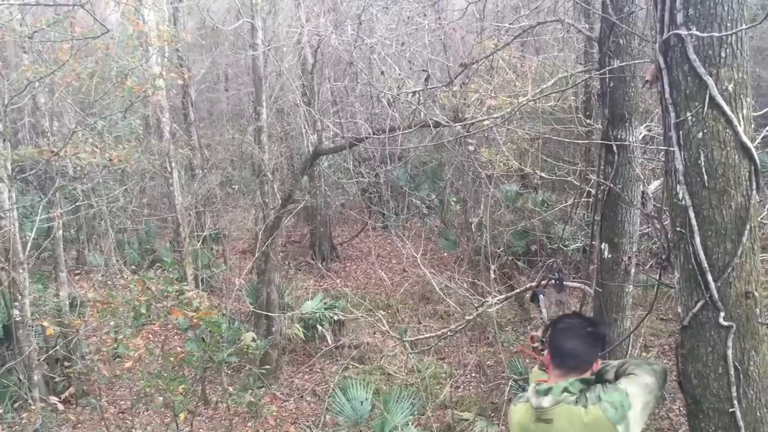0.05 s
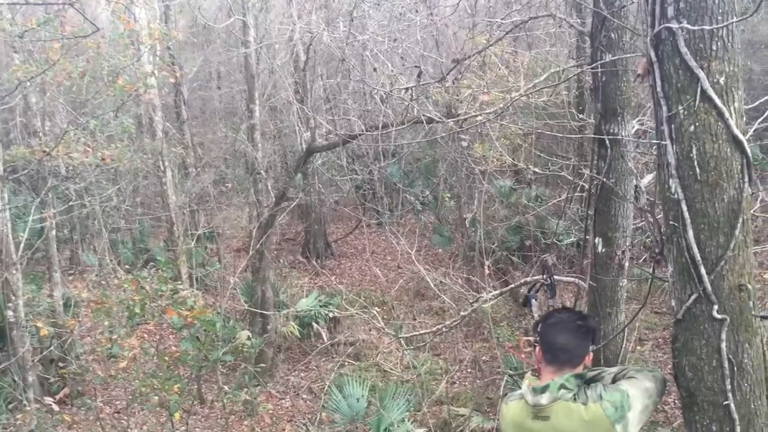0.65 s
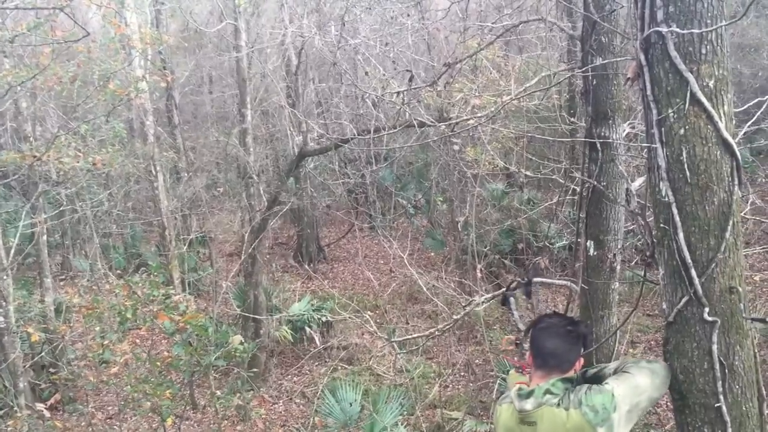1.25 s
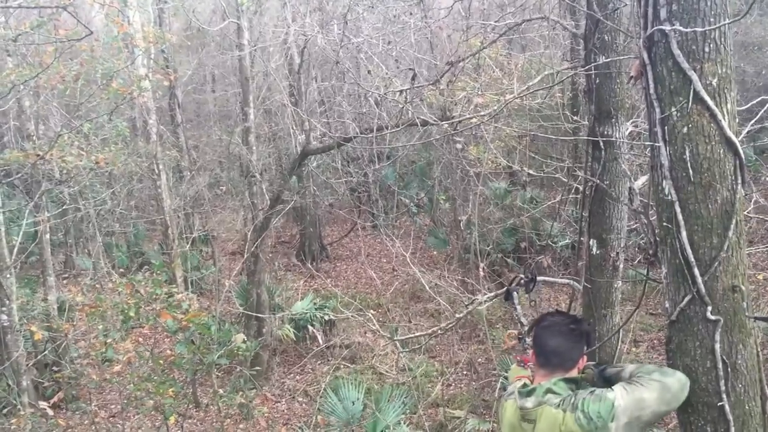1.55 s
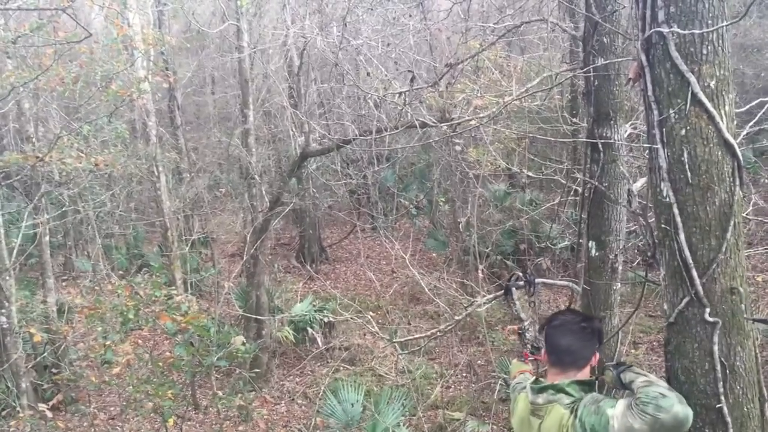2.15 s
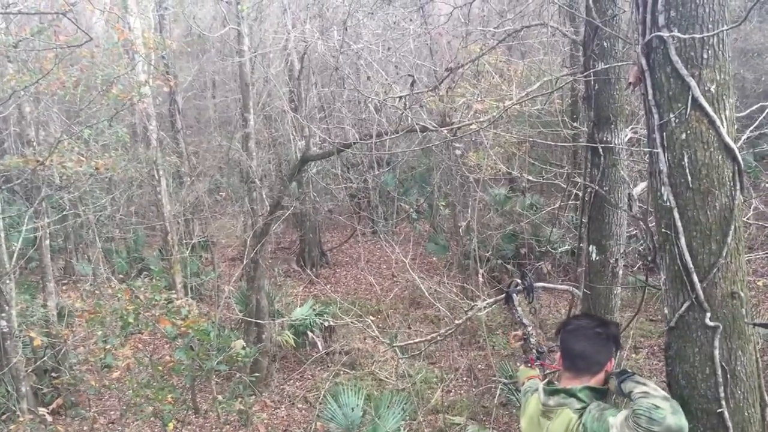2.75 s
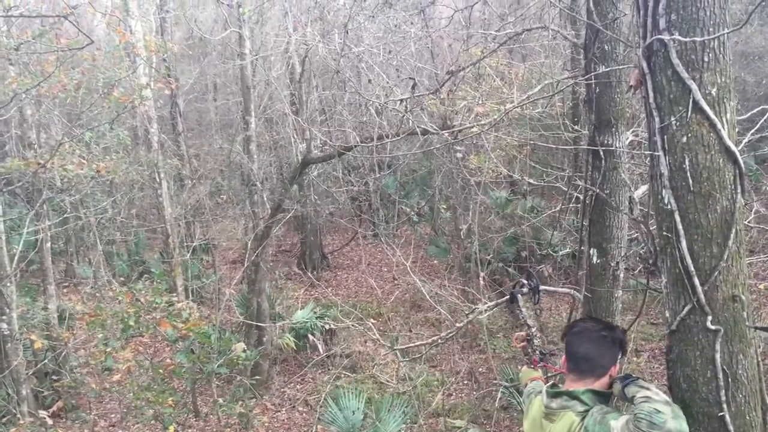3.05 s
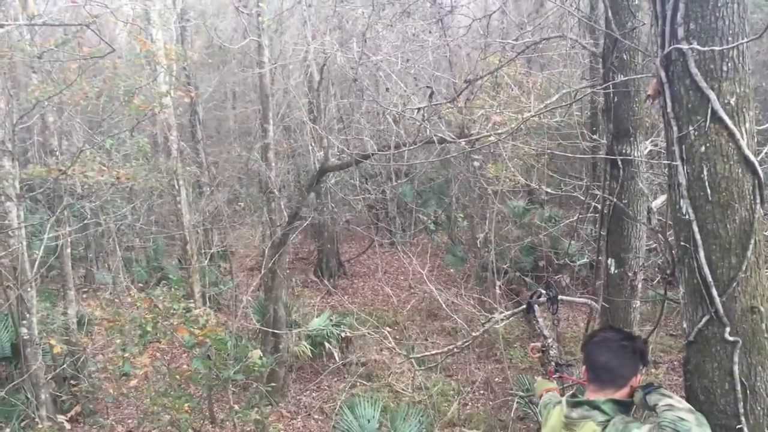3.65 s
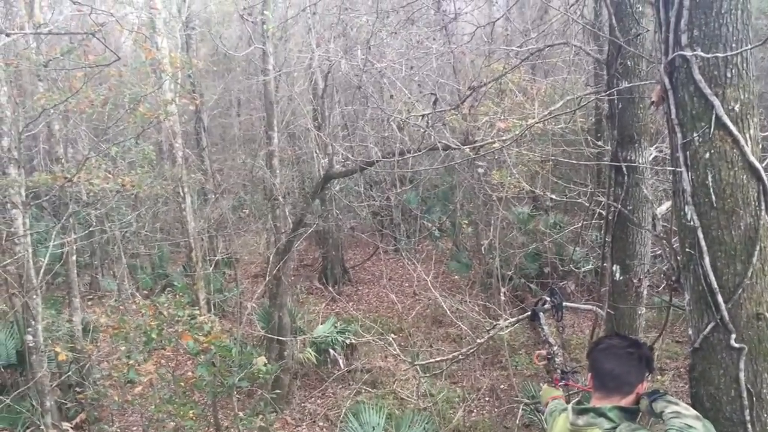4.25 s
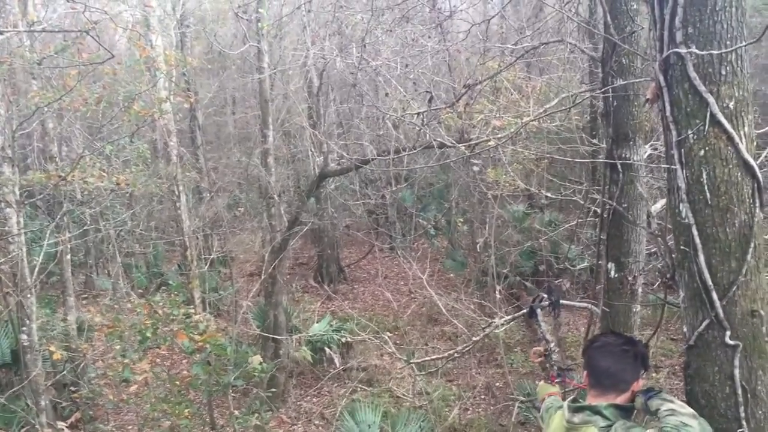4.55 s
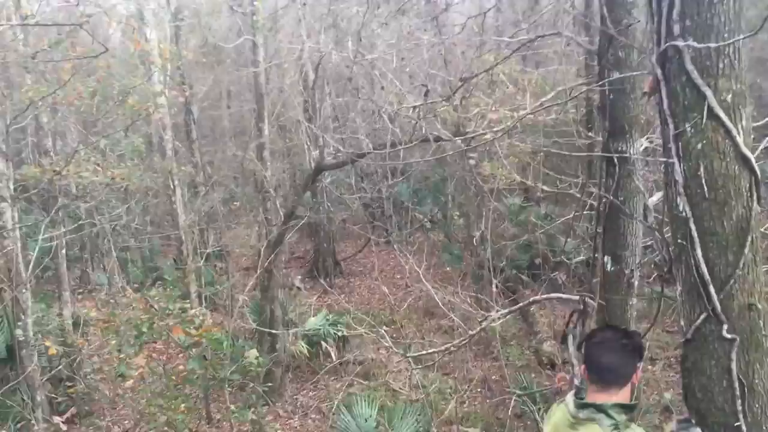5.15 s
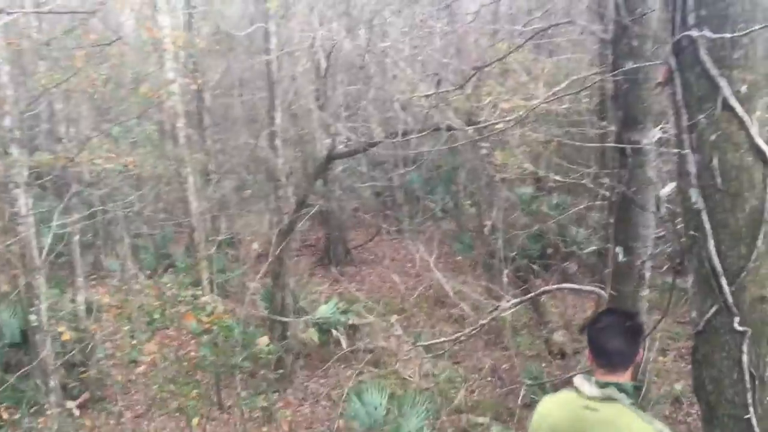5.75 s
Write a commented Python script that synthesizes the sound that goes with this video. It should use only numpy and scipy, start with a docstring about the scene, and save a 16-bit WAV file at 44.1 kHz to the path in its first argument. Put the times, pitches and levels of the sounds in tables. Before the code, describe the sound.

In quiet woods with crickets and distant crows, a compound bow fires with a crack, the arrow strikes, and an animal bolts through dry leaves.

```python
"""A sharp tick from a compound bow's gear, in quiet woods with trilling crickets and far cawing crows.
Cloth brushes and the bow ticks as it is drawn. The release clicks, the string slams into its stop and
rings the frame; the arrow hisses away and strikes. Trunks scatter each crack. An animal bolts
through dry leaves and twigs with a few dull hoof beats."""
import sys
import numpy as np
from scipy import signal
from scipy.fft import rfft, irfft, next_fast_len
from scipy.io import wavfile
from scipy.ndimage import uniform_filter1d

SR = 44100
rng = np.random.default_rng(int(sys.argv[2]) if len(sys.argv) > 2 else 0)


def waveform_to_disk(signal):
    """Save audio, clipped to [-1, 1], as 16-bit WAV at the path in sys.argv[1]."""
    frames = np.transpose(np.atleast_2d(signal))
    scaled = np.clip(frames, -1, 1) * 32767
    samples = np.round(scaled).astype(np.int16)
    wavfile.write(sys.argv[1], SR, samples)


N = 259749
TIME = np.arange(N) / SR


def bow(release_s=4.6883, stop_s=4.7115, whip_db=-46, surge_db=-23.5, surge_s=0.0021):
    """The string whips forward, slams into its stop and sets the frame ringing."""
    # release, string stop, limbs: start_s, crack_db, decay_s, push_db, push_hz
    impacts = [(4.6883, -25, 0.0025, -34.5, 258), (4.7103, -19.5, .003, -36, 910),
               (4.7118, -20.5, 0.0025, -24.5, 210), (4.7136, -27, 0.0093, -18, 660),
               (4.716, -34, .006, -30, 100), (4.7245, -37, 0.0067, -28, 219), (4.7415, -38, .005, -35, 240)]
    # crack and whip spectrum: freq_hz, density_db
    crack_spectrum = [(40, -30), (150, 0), (480, -4), (1100, -2), (1600, -3), (2500, 4), (2950, -5),
                      (3700, 0.5), (5400, 2), (7500, -5), (9000, -0.5), (10500, -7), (13000, -7),
                      (16000, -14)]
    # riser, limb and string modes: freq_hz, level_db, t60_s
    frame_modes = [(109.7, -27.5, 0.11), (216, -28, 0.13), (288.8, -32.5, 0.21), (318, -42.5, 0.48),
                   (355, -29, 0.13), (606, -30, .19), (670, -28.5, 0.11), (724, -36, 0.14),
                   (989, -35, 0.15), (1243, -29.5, 0.1), (1320, -32, 0.11), (1970, -42, 0.26),
                   (2320, -34, 0.14), (2510, -30, .13), (2620, -36, 0.12), (3180, -36, .12),
                   (3410, -38, .13), (3670, -43, 0.13), (4350, -36, 0.13), (5320, -27, .11),
                   (7104, -37, .11)]
    # trunk echo spectrum: freq_hz, density_db
    echo_spectrum = [(30, -44), (60, -10), (300, -2), (480, -9.5), (650, -8), (1100, -6.5), (1550, -10.5),
                     (2300, -8), (5500, -10.5), (9000, -12.5), (13800, -17), (16000, -25)]
    out, t = blows(impacts, crack_spectrum), TIME[:SR]
    whip = amp(whip_db) + amp(surge_db) * np.exp(-abs(TIME - stop_s) / surge_s)
    out += whip * (TIME > release_s) * (TIME < stop_s) * noise(crack_spectrum, N)
    # neighbouring modes swing in opposite directions
    ring = sum((-1) ** k * amp(db - 60 * t / t60_s) * np.sin(2 * np.pi * hz * t)
               for k, (hz, db, t60_s) in enumerate(frame_modes))
    add(out, stop_s, amp(-2) * ring * (1 - np.exp(-t / 0.0019)))
    add(out, stop_s, scatter(echo_spectrum, near_db=-28.5, stretch=0.82, far_db=-50, far_t60_s=1.16))
    return out


def arrow(launch_s=4.7115, hit_s=5.048, hiss_db=-47.5, rise_s=0.045, distance_doubling_s=0.19):
    """The vanes hiss, fading with distance; the head strikes with a crack."""
    # strike and first reflections: start_s, crack_db, decay_s, push_db, push_hz
    impacts = [(5.043, -24.5, 0.0015, -23, 706), (5.0462, -23, .005, -25, 237),
               (5.0538, -39, .006, -20, 600), (5.056, -40, .006, -35, 74), (5.082, -36, .002, -41, 700)]
    # strike spectrum: freq_hz, density_db
    crack_spectrum = [(100, 11), (400, 4.5), (1800, 1), (3500, -7.5), (5000, -3), (6600, 6), (9200, 1),
                      (10500, -6), (16000, -16)]
    # air on the vanes: freq_hz, density_db
    vane_spectrum = [(120, -45), (200, -15), (299, -6), (612, -16), (1420, -6), (1620, -11.5), (2420, -4),
                     (4860, -5), (5520, -3.5), (16000, -23.5)]
    # trunk echo spectrum: freq_hz, density_db
    echo_spectrum = [(30, -36), (60, -6), (160, -8.5), (360, -8.5), (430, -17), (640, -9.5), (1400, -2),
                     (1800, -13), (2200, -8.5), (4500, -11), (6700, -6.5), (9300, -7), (10500, -17),
                     (16000, -22)]
    out = blows(impacts, crack_spectrum)
    flown_s = np.maximum(TIME - launch_s, 0)
    envelope = np.minimum(flown_s / rise_s, 1) / (1 + flown_s / distance_doubling_s) * (TIME < hit_s)
    out += amp(hiss_db) * envelope * noise(vane_spectrum, N)
    add(out, hit_s, scatter(echo_spectrum, near_db=-33, stretch=1.43, far_db=-38.5, far_t60_s=1.2))
    return out


def blows(rows, spectrum):
    """Each blow is a short crack and one swing of pushed air."""
    out, t = np.zeros(N), TIME[:4096]
    for start_s, crack_db, decay_s, push_db, push_hz in rows:
        crack = noise(spectrum, len(t)) * np.exp(-t / decay_s)
        phase = 2 * np.pi * push_hz * t
        surface_speed = np.sin(phase) * phase ** 2 * np.exp(-phase / 1.57)
        push = np.gradient(surface_speed)  # pressure follows acceleration
        add(out, start_s, amp(crack_db) * crack + amp(push_db) * push / abs(push).max())
    return out


def gear_ticks(knock_db=-27, knock_hz=900):
    """The bow's gear ticks, each time over a hollow knock."""
    # ticks, release catch last: start_s, level_db, centre_hz
    ticks = [(.0514, -28, 5900), (.408, -64, 6000), (1.134, -50.5, 1500), (1.333, -44, 1580),
             (1.572, -60, 2000), (4.333, -63, 3000), (4.6883, -33, 2470)]
    knocks = [(start_s, db + knock_db, knock_hz) for start_s, db, _ in ticks]
    return snaps(ticks, octaves=1.02, decay_s=0.0011) + snaps(knocks, octaves=0.4, decay_s=0.0028)


def animal(knock_db=-10.5, knock_ratio=2.48, kick_delay_s=0.055, kick_rise_s=0.022, settle_s=0.21):
    """Each hoof thumps the soil, knocks with its edge and kicks up leaves that settle."""
    # footfalls: start_s, thump_db, pitch_hz, leaves_db
    hooves = [(5.344, -32.5, 270, -44), (5.558, -44, 215, -47), (5.665, -38, 204, -50.5),
              (5.81, -57, 219, -52.5)]
    thuds, leaf_power = np.zeros(N), np.zeros(N)
    since_s = TIME[:SR] - kick_delay_s
    kick = 0.5 * (1 + np.tanh(since_s / kick_rise_s)) * np.exp(-np.maximum(since_s, 0) / settle_s)
    for start_s, db, hz, leaves_db in hooves:
        knock = amp(knock_db) * thump(hz * knock_ratio, rise_s=0.0017)
        add(thuds, start_s, amp(db) * (thump(hz, rise_s=0.0062) + knock))
        add(leaf_power, start_s, (amp(leaves_db) * kick) ** 2)
    return leaves() * np.sqrt(leaf_power) + woods(thuds, t60_s=0.25, wet_db=-14)


def thump(hz, rise_s, sag=0.23):
    """Soft soil swings a few times, sinking in pitch as it gives."""
    u = TIME[:6000] / rise_s
    pitch_hz = hz * (1 + sag * (2 * np.exp(-u / 2) - 1))
    return (u * np.exp(1 - u)) ** 2 * np.sin(2 * np.pi * np.cumsum(pitch_hz) / SR)


def leaves(grains_per_s=5000, spread_db=3.5, clump_db=2.6):
    """Dry leaves crackle in clumps; rms 1."""
    # crackle spectrum: freq_hz, density_db
    leaf_spectrum = [(88, -35), (150, -9), (209, -6.5), (376, -9.5), (1040, -11), (1360, -8.5), (1790, -14),
                     (2140, -9), (4950, -8.5), (5460, -7), (9260, -13), (14500, -24), (16000, -34)]
    sizes = amp(spread_db * np.minimum(rng.exponential(1, N), 3.5)) * rng.choice([-1, 1], N)
    clumps = amp(clump_db * wobble(samples=400))
    grains = sizes * clumps * (rng.random(N) < grains_per_s / SR)
    return colour(woods(grains, t60_s=0.69, wet_db=-2), leaf_spectrum)


def twigs():
    """Twigs snap around the animal."""
    # snaps: start_s, level_db, centre_hz
    breaks = [(5.1305, -34, 4500), (5.552, -43.5, 4000), (5.6216, -38.5, 5050), (5.693, -38.5, 6500)]
    return snaps(breaks, octaves=0.99, decay_s=0.003)


def cloth():
    """Clothing brushes as the archer moves."""
    # brushes: start_s, length_s, level_db, centre_hz, width_octaves
    scuffs = [(.011, 0.017, -55, 8000, 0.56), (0.03, 0.034, -54, 6200, .42), (.066, .07, -55, 6750, .24),
              (0.657, 0.083, -69, 1000, 1.6), (1.144, .3, -79, 8600, .2), (1.283, .03, -61.5, 8750, .2)]
    out = np.zeros(N)
    for start_s, length_s, db, hz, octaves in scuffs:
        stroke = np.sin(np.pi * np.minimum(TIME[:SR] / length_s, 1))
        add(out, start_s, amp(db) * stroke * band(rng.standard_normal(SR), hz, octaves))
    return out


def crows(caw_s=0.16, arch=0.17, rough=0.28, rasp=0.66, treeline_s=0.285, treeline_db=-8):
    """Hoarse arched caws; mainly the throat resonance on the third harmonic carries this far."""
    # caws, the answering crow higher: start_s, level_db, throat_hz
    caws = [(1.03, -57, 1410), (1.21, -68, 1750), (1.39, -65, 1650), (1.765, -57, 1419),
            (1.99, -70.5, 1797), (2.385, -57.5, 1422), (2.985, -59, 1410), (3.62, -62, 1409),
            (4.25, -63.5, 1406), (4.89, -62, 1422), (5.58, -58, 1409)]
    out = np.zeros(N)
    effort = np.sin(np.pi * np.linspace(0, 1, int(caw_s * SR)))  # lifts pitch and loudness together
    for start_s, db, throat_hz in caws:
        jitter, breath = rng.standard_normal((SR // 2, 2))[:len(effort)].T
        pitch_hz = throat_hz / 3 * (1 + arch * (effort - 0.78) + 0.023 * unit(uniform_filter1d(jitter, 200)))
        turns = np.cumsum(pitch_hz) / SR
        voice = unit(sum(np.cos(2 * np.pi * k * turns) for k in range(2, 6)))
        rattle = 1 + rasp * np.sin(2 * np.pi * 0.18 * turns)
        drive = ((1 - rough) * voice + rough * band(breath, throat_hz, octaves=0.32)) * rattle
        throat = band(drive, throat_hz, octaves=0.16) + amp(-22) * band(drive, hz=1936, octaves=0.066)
        call = throat * abs(effort) ** 0.59
        add(out, start_s, amp(db) * call)
        add(out, start_s + treeline_s, amp(db + treeline_db) * call)  # echo off the far trees
    return woods(out, t60_s=1.44, wet_db=0) * amp(2)


def crickets(wander=0.00502, droop=0.043, flutter_db=3, surge_db=1.4):
    """Each wing stroke is a brief tone that sags in pitch; the woods blur the trills."""
    # one row a cricket: pitch_hz, level_db, strokes_per_s
    singers = [(5114, -10.5, 61), (5290, -8.5, 66), (5460, -2, 67), (5516, 0.5, 73), (5630, -5, 76),
               (5765, -11.5, 93)]
    # chorus loudness: time_s, level_db
    chorus_curve = [(.35, -63.5), (.7, -67.5), (1.9, -61.5), (3.15, -61.5), (3.85, -68.5), (4.65, -62)]
    trills = np.zeros(N)
    for hz, db, strokes_per_s in singers:
        drift, waver, flutter = wobble(samples=4000), wobble(samples=120), wobble(samples=900)
        stroke = (np.cumsum(strokes_per_s * (1 + 0.05 * drift)) / SR + rng.random()) % 1
        pitch_hz = hz * (1 + wander * waver + droop * (0.5 - stroke))
        envelope = amp(db + drift + flutter_db * flutter) * np.sin(np.pi * stroke) ** 4
        trills += envelope * np.sin(2 * np.pi * np.cumsum(pitch_hz) / SR)
    chorus = woods(trills, t60_s=0.5, wet_db=-3.5) * amp(surge_db * wobble(samples=2500))
    return amp(np.interp(TIME, *np.transpose(chorus_curve))) * unit(chorus)


def air(hush_db=-69.5, hiss_db=-75.5, rumble_db=-71, lump_db=2):
    """Hush of the woods, thin hiss and a lumpy rumble that swells three times."""
    # still air: freq_hz, density_db
    hush_spectrum = [(15, -49), (25, -12.5), (112, -4), (339, -14.5), (378, -13.5), (412, -18),
                     (584, -17.5), (1050, -21), (1140, -18), (2150, -20.5), (4500, -25.5), (5850, -54),
                     (9900, -120)]
    # thin hiss: freq_hz, density_db
    hiss_spectrum = [(2500, -17), (4300, -4), (6500, -2.5), (9500, -6.5), (10400, -10.5), (11500, -7),
                     (15800, -13)]
    # low rumble: freq_hz, density_db
    rumble_spectrum = [(25, -10.5), (60, 2.5), (110, 0.5), (170, -6.5), (300, -22.5), (600, -41.5)]
    # rumble swells at the draw, before and after the shot: peak_s, half_width_s, level_db
    swells = [(1.35, 0.3, -63), (4.65, 0.17, -70.5), (5.62, .13, -55.5)]
    power = amp(rumble_db) ** 2
    for peak_s, half_width_s, db in swells:
        power += (amp(db) * np.exp(-0.5 * ((TIME - peak_s) / half_width_s) ** 2)) ** 2
    rumble = np.sqrt(power) * amp(lump_db * wobble(samples=2822)) * noise(rumble_spectrum, N)
    return amp(hush_db) * noise(hush_spectrum, N) + amp(hiss_db) * noise(hiss_spectrum, N) + rumble


def scatter(spectrum, near_db, stretch, far_db, far_t60_s):
    """Echo of one crack: near trunks die fast, distant ones linger with less treble."""
    # near-trunk decay before stretch: freq_hz, t60_s
    near_decay = [(100, 0.34), (600, 0.36), (1500, 0.3), (6000, 0.38), (10000, 0.34), (15000, 0.28)]
    taps = colour(rng.standard_normal(SR) * amp(3.5 * rng.standard_normal(SR)), spectrum)
    hz, frame_s, bins = signal.stft(taps, SR, nperseg=256)
    hz = hz[:, None]
    near = amp(near_db - 60 * frame_s / (stretch * read(near_decay, hz)))
    far = amp(far_db - 60 * frame_s / far_t60_s) / (1 + (hz / 7000) ** 2)
    echo = signal.istft(bins * np.hypot(near, far), SR, nperseg=256)[1][:SR]
    return echo * (1 - np.exp(-TIME[:SR] / 0.003))


def woods(x, t60_s, wet_db, echoes_per_s=2500):
    """Direct sound plus sparse echoes from many trunks."""
    t = TIME[:SR]
    taps = rng.standard_normal(SR) * (rng.random(SR) < echoes_per_s / SR)
    taps *= amp(-60 * t / t60_s) * (1 - np.exp(-t / 0.019))
    echoes = signal.fftconvolve(x, taps / np.linalg.norm(taps))[:N]
    return (x + amp(wet_db) * echoes) / np.hypot(1, amp(wet_db))


def snaps(rows, octaves, decay_s):
    """Short dry bursts, each in a band around its own centre."""
    out, fall = np.zeros(N), np.exp(-TIME[:4096] / decay_s)
    for start_s, db, hz in rows:
        edges_hz = np.clip(hz * 2.0 ** np.array([-octaves, octaves]), 50, SR * 0.45)
        bandpass = signal.butter(3, edges_hz, "bandpass", fs=SR, output="sos")
        snap = signal.sosfilt(bandpass, rng.standard_normal(len(fall)) * fall)
        add(out, start_s, amp(db) * snap * np.linalg.norm(fall) / np.linalg.norm(snap))
    return out


def amp(db):
    """Decibels to gain."""
    return 10 ** (np.asarray(db) / 20)


def unit(x):
    """Scales to rms 1."""
    return x / np.sqrt(np.mean(x ** 2) + 1e-20)


def read(points, hz):
    """Interpolates on a log-frequency axis."""
    freq_hz, value = np.transpose(points)
    return np.interp(np.log(hz + 1), np.log(freq_hz + 1), value)


def add(mix, start_s, sound):
    """Mixes a sound in at start_s."""
    part = mix[max(round(start_s * SR), 0):][:len(sound)]
    part += sound[:len(part)]


def colour(x, spectrum):
    """Filters by a spectrum; rms 1."""
    gain = amp(read(spectrum, np.fft.rfftfreq(len(x), 1 / SR)))
    return unit(irfft(rfft(x) * gain, len(x)))


def noise(spectrum, samples):
    """Coloured noise; rms 1."""
    return colour(rng.standard_normal(next_fast_len(samples)), spectrum)[:samples]


def band(x, hz, octaves):
    """Bell-shaped pass band; rms 1."""
    freq_hz = np.fft.rfftfreq(len(x), 1 / SR) + 1
    bell = np.exp(-0.5 * (np.log2(freq_hz / hz) / octaves) ** 2)
    return unit(irfft(rfft(x) * bell, len(x)))


def wobble(samples):
    """Moving average of white noise; rms 1."""
    return unit(uniform_filter1d(rng.standard_normal(N), samples))


def scene():
    """All sources at one microphone."""
    background = air() + crickets() + crows()
    small_sounds = woods(gear_ticks() + twigs() + cloth(), t60_s=0.19, wet_db=-11.5)
    return (bow() + arrow() + animal() + small_sounds + background)[None]


def record(dry, low_cut_hz=43, band_limit_hz=15900):
    """The microphone's bass cut, then the recorder's band limit."""
    thin = signal.sosfilt(signal.butter(2, low_cut_hz, "highpass", fs=SR, output="sos"), dry)
    lowpass = signal.firwin(255, band_limit_hz, window=("kaiser", 9), fs=SR)
    return signal.oaconvolve(thin, lowpass[None], "same")


dry = scene()
out = record(dry)
waveform_to_disk(out)
```